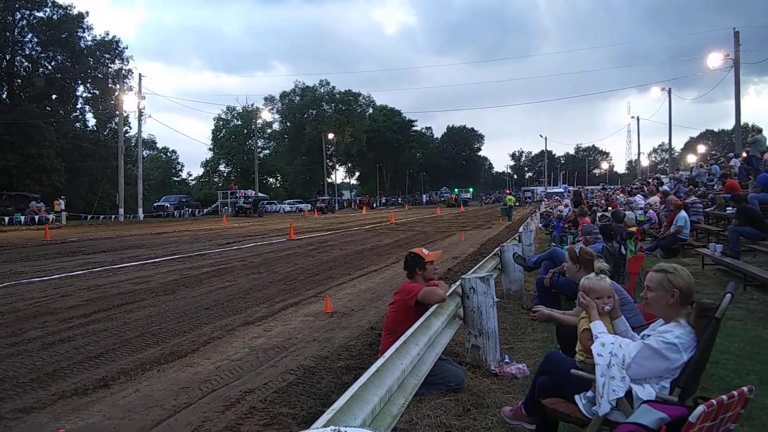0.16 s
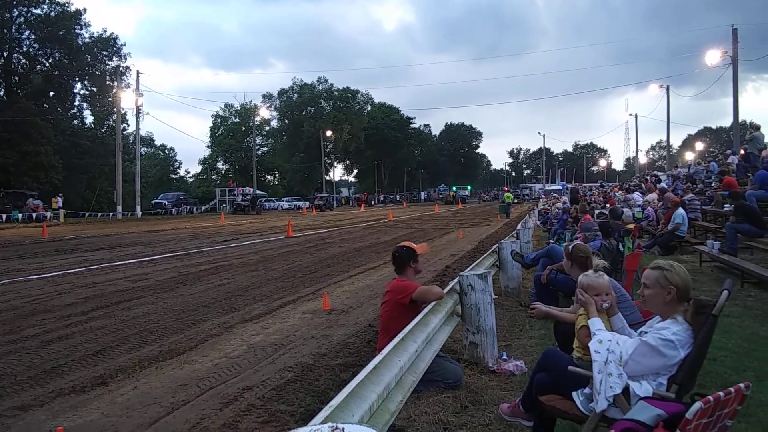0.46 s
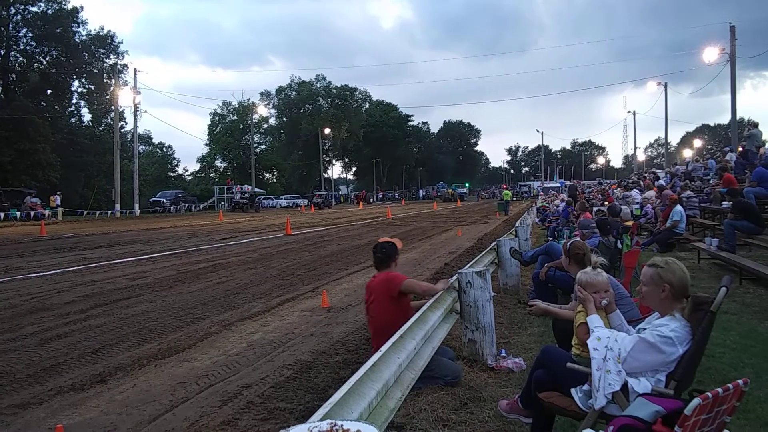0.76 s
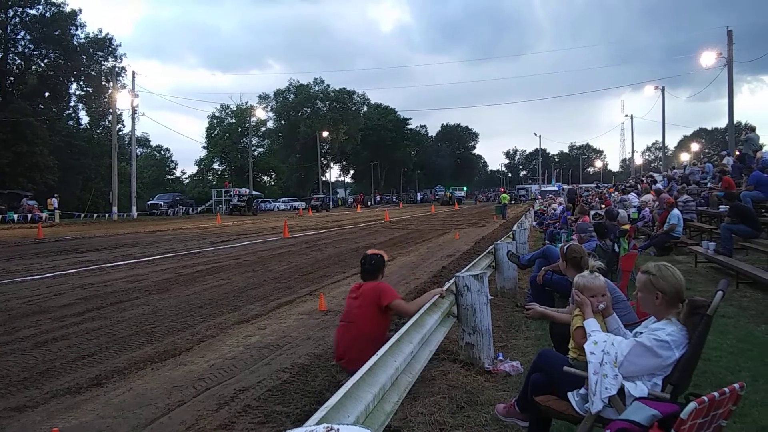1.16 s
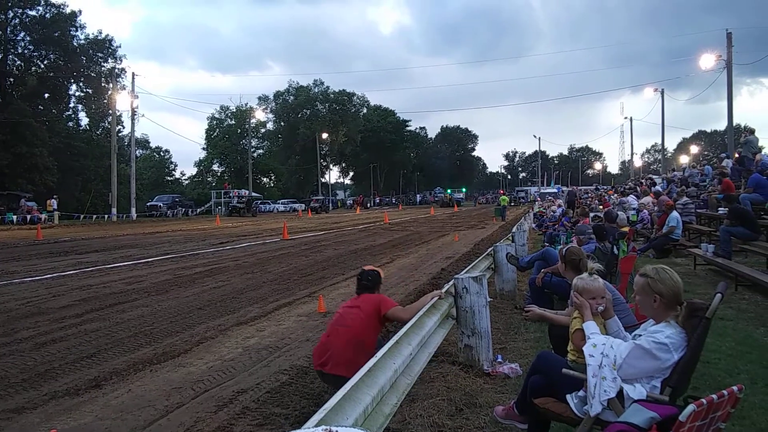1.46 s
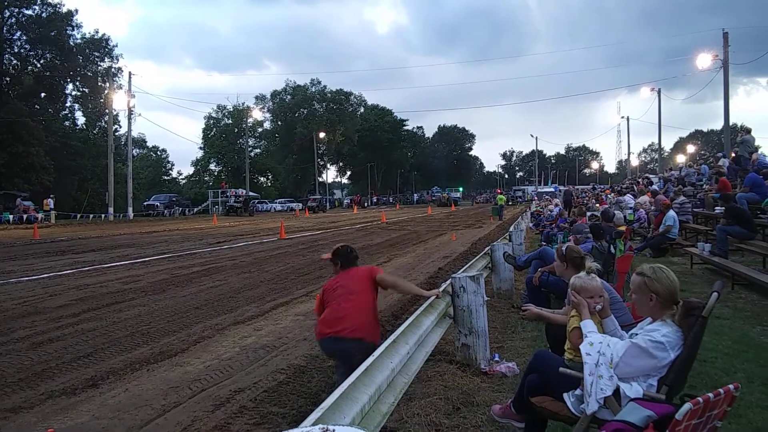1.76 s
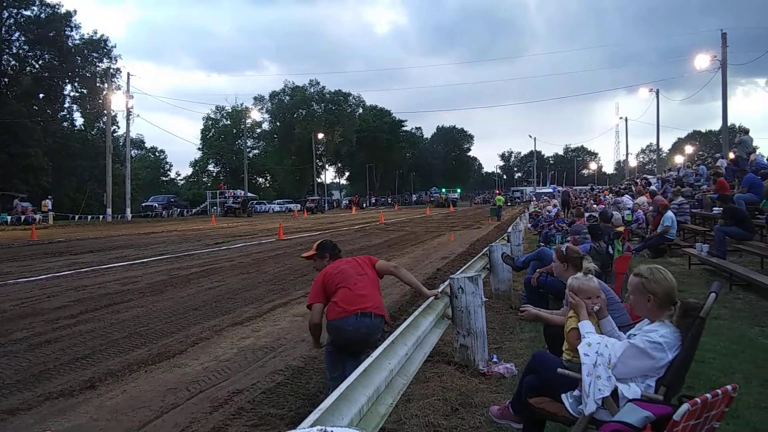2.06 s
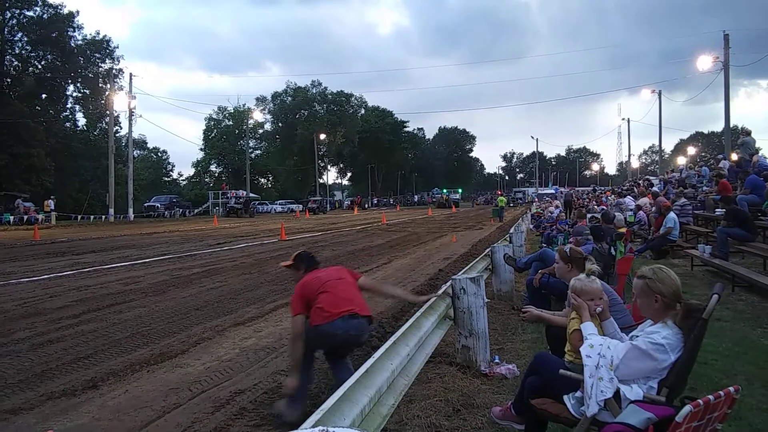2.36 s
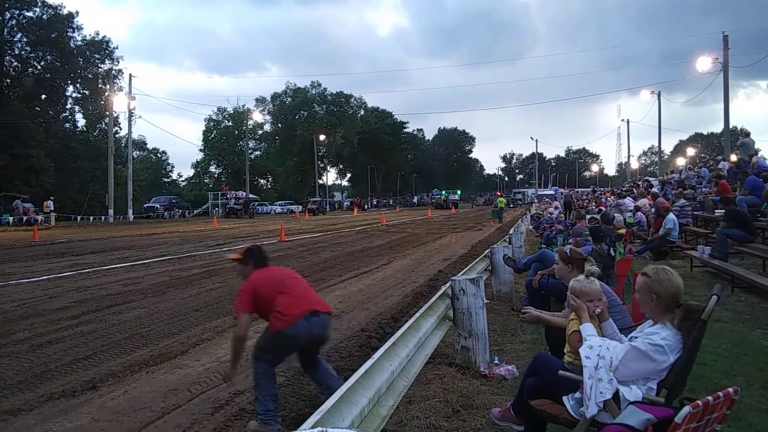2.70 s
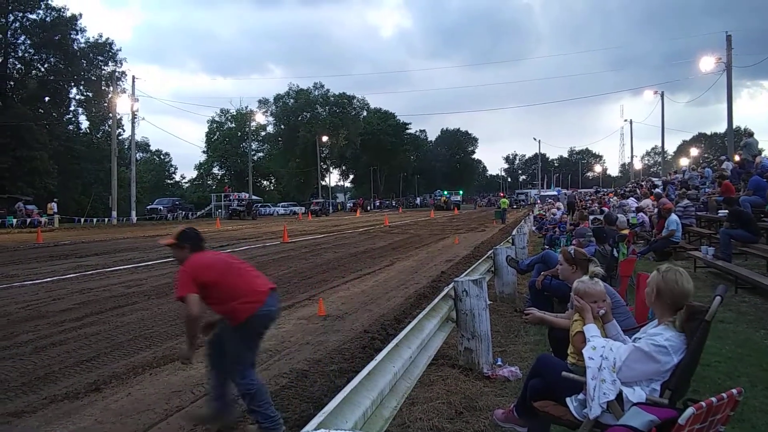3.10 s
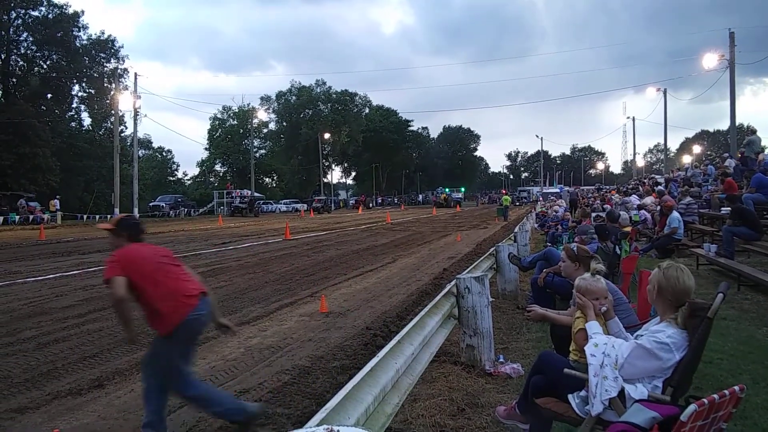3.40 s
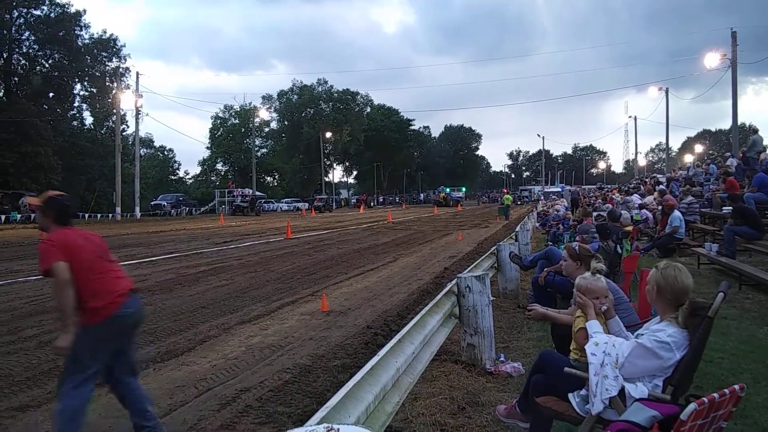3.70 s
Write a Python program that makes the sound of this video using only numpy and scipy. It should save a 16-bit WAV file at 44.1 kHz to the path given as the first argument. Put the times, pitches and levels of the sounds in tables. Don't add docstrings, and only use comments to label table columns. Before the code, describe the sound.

A pulling truck's V8 with open exhaust roars throughout, slightly muted for the first 0.25 s, then at full, nearly constant loudness. Rapid uneven cracks fuse into a raspy buzz with steady low tones and broadband hiss. Pitch sags until about 1.5 s, climbs by 2.7 s, then drops again from about 3.2 s to the end. Outdoor ground reflections shift its colour; faint wind puffs at 3.1 s. The small microphone is overloaded and compressed.

```python
import sys
import numpy as np
from scipy import signal
from scipy.fft import rfft, irfft
from scipy.io import wavfile
from scipy.ndimage import uniform_filter1d, minimum_filter1d

SR = 44100
rng = np.random.default_rng(int(sys.argv[2]) if len(sys.argv) > 2 else 0)


def magnitude_from_level(level_db):
    exponent = np.asarray(level_db, float) / 20
    return 10 ** exponent


def output_pcm(signal):
    pcm = np.clip(np.atleast_2d(signal).T, -1, 1) * 32767
    wavfile.write(sys.argv[1], SR, np.round(pcm).astype(np.int16))


N = 169785
TIME_S = np.arange(N) / SR

# t/s, cycle rate f/Hz, firing tone level/dB, its octave level/dB, bank-beat tone level/dB
ENGINE = [(0.0, 54.26, -14, -25.5, -31.5), (0.59, 52.98, -21, -21, -26.5),
          (0.79, 52.05, -26.5, -20.5, -21.5), (0.87, 52.2, -23.5, -32, -22), (1.01, 50.5, -24, -20.5, -22),
          (1.49, 48.2, -22, -23.5, -33), (1.6, 48.92, -23.5, -21, -31), (1.81, 53.84, -23, -22, -36),
          (2.0, 54.8, -15.5, -18, -34), (2.08, 55.07, -20.5, -23, -25), (2.24, 57.63, -22.5, -29, -24.5),
          (2.54, 55.75, -19.5, -32, -21.5), (2.74, 58.23, -18, -28, -29), (3.03, 56.43, -22, -55, -17),
          (3.13, 57.57, -28, -30, -21.5), (3.23, 57.25, -21.5, -22, -21), (3.46, 54.13, -25, -45, -27),
          (3.85, 51.64, -22, -27, -17.5)]


def evened(x):
    return x / np.sqrt(np.mean(x ** 2) + 1e-20)


def read(points, hz):
    f, db = np.transpose(points)
    return np.interp(np.log(hz + 1), np.log(f + 1), db, left=-90, right=-90)


def slow(top_hz, count):
    t = np.arange(0, N + 256, 256) / SR
    hz = top_hz * np.geomspace(.15, 1, num=16)[:, None]
    sines = np.sin(2 * np.pi * (hz * t + rng.random((count, 16, 1))))
    sums = (sines / np.sqrt(hz)).sum(1)
    return np.array([np.interp(TIME_S, t, evened(s)) for s in sums])


def control(column):
    points = np.transpose(ENGINE)
    return np.interp(TIME_S, points[0], points[column])


def cycles():
    hz = control(column=1)
    return hz, np.cumsum(hz) / SR


def orders(multiples, levels_db, wobble_db, wobble_hz):
    wander_s, wander_hz = 3e-5, 24.71
    hz, turn = cycles()
    sways = slow(wobble_hz, count=len(multiples))
    wanders = slow(wander_hz, count=len(multiples))
    total = np.zeros(N)
    for k, db, sway, wander in zip(multiples, levels_db, sways, wanders):
        phase = round(k) * (turn + wander_s * hz * wander) + rng.random()
        total += magnitude_from_level(db + wobble_db * sway) * np.sin(2 * np.pi * phase)
    return total


def cracks():
    # place in cycle/1, crack level/dB
    cylinders = [
        (.08, 2.5),
        (.15, -3),
        (.27, -2.7),
        (.41, -1.2),
        (.59, 1.5),
        (.73, 3),
        (0.809, -3),
        (.91, -5.3),
    ]
    crack_t60_s, puff_t60_s, jitter_s = 0.015, 0.018, 3.2e-5
    drift_db, drift_hz, spread_db = 1.6, 2.075, 1.5
    firings = 300
    turn, t = cycles()[1], np.arange(1024) / SR
    crack, gate = np.zeros(N), np.zeros(N)
    for (place, db), drift in zip(cylinders, slow(drift_hz, count=len(cylinders))):
        luck = rng.standard_normal((firings, 2))
        at = np.interp(np.arange(firings) + place, turn, np.arange(N), right=N)
        at = at + jitter_s * SR * luck[:, 0]
        keep = at < N - 2
        i, part = at[keep].astype(int), at[keep] % 1
        size = magnitude_from_level(db + drift_db * drift[i] + spread_db * luck[keep, 1])
        train = np.zeros(N)
        train[i], train[i + 1] = size * (1 - part), size * part
        burst = evened(rng.standard_normal(1024) * magnitude_from_level(-60 * t / crack_t60_s))
        crack += signal.oaconvolve(train, burst)[:N]
        gate += signal.oaconvolve(train, magnitude_from_level(-60 * t / puff_t60_s))[:N]
    hiss = signal.lfilter([1, -.55], [1], rng.standard_normal((2, N)))
    crack = signal.lfilter([1], [1, -.25], crack)
    gust = magnitude_from_level(.7 * slow(20, count=1)[0])
    crack_db, puff_db, steady_db = -17.5, -18.5, -19
    return [(crack_db, gust * crack), (puff_db, gust * gate * hiss[0]), (steady_db, gust * hiss[1])]


def overtones():
    # multiple of cycle/1, level/dB
    rings = [(28, -3), (31, -1), (32, -1), (35, 0), (36, 1), (39, 0), (42, -3), (43, -1), (44, 0), (47, 0),
             (48, -2), (51, -2), (52, -1), (55, 0), (59, -3), (63, -1)]
    multiples, levels_db = np.transpose(rings)
    return [(-23, orders(multiples, levels_db, wobble_db=2.5, wobble_hz=12))]


def over_ground(layers):
    # f/Hz, level/dB
    near_colour = [(900, -23), (1500, -10.5), (2500, -2.5), (3700, -10), (6900, -2.5), (8600, -25),
                   (11700, -28), (15800, -53)]
    # f/Hz, level/dB
    halfway_colour = [(900, -40), (1500, -8), (2450, -0.5), (3900, -11.5), (6400, 1.5), (8700, -26.5),
                      (10900, -22), (15800, -49.5)]
    # f/Hz, level/dB
    far_colour = [(900, -53), (1500, -8.5), (2600, -3.5), (4000, -16), (5900, 0.5), (8000, -22),
                  (11800, -31), (15800, -48)]
    halfway_s, opening_s, opening_db, patch_db = 2.2, .25, -5, 1.5
    hz, t, z = signal.stft(np.array([x for _, x in layers]), SR, nperseg=512)
    half = np.interp(t, [0, halfway_s, N / SR], [0, 1, 0])
    near = (1 - half) * (t < halfway_s)
    far = (1 - half) * (t >= halfway_s)
    db = np.outer(read(near_colour, hz), near)
    db += np.outer(read(halfway_colour, hz), half)
    db += np.outer(read(far_colour, hz), far)
    db += opening_db * np.maximum(1 - t / opening_s, 0)
    luck = rng.standard_normal((len(t), len(hz)))
    patches = uniform_filter1d(uniform_filter1d(luck, size=40, axis=0), size=3, axis=1)
    db += patch_db * evened(patches).T
    coloured = signal.istft(z * magnitude_from_level(db), SR, nperseg=512)[1][:, :N]
    return sum(magnitude_from_level(level_db) * evened(x) for (level_db, _), x in zip(layers, coloured))


def tones():
    # multiple of cycle/1, rms level/dB, drift with distance/(dB/s), bend/(dB/s2),
    # rise with speed/(dB/Hz)
    exhaust = [(3.0, -48.5, 0, 1.5, 0.7), (5.0, -41, -0.7, 0.5, 1.35), (6.0, -48.5, 0.0, 0.5, 0.5),
               (7.0, -44.5, -2.5, 1.8, 1.9), (9.0, -37.5, -1.2, 2.3, 1.24), (10.0, -38, -0.5, -0.5, 1.5),
               (11.0, -27.5, 2, 1.2, 1.24), (12.0, -29, -0.6, 1.2, 0.1), (13.0, -26.5, 0.14, 2.0, 0.4),
               (14.0, -32.5, 6, -5, -1), (15.0, -32.5, 0.5, 0.7, -0.3), (17.0, -35.5, 4, 0.9, 2),
               (18.0, -33, 1.8, -4, 1.2), (20.0, -34, -0.9, 2.1, -1.2), (21.0, -38, -1.5, 1, 0.9),
               (22.0, -46, 2.5, 2, -0.5), (23.0, -45, -2, 0.6, 1.5), (24.0, -42, 0.5, 2.9, -0.9)]
    leading = [8, 16, 19]
    mid_s, mid_hz = 1.9, 54
    hz, t = cycles()[0] - mid_hz, TIME_S - mid_s
    levels_db = [db + drift * t + bend * t ** 2 + rise * hz for _, db, drift, bend, rise in exhaust]
    levels_db += [control(column=c) for c in range(2, len(ENGINE[0]))]
    multiples = [row[0] for row in exhaust] + list(leading)
    return np.sqrt(2) * orders(multiples, levels_db, wobble_db=2, wobble_hz=14)


def roar():
    # f/Hz, level/dB
    turbulence = [(15, -54), (25, -24), (332, -16.5), (415, -9), (519, -11.5), (626, -4.5), (756, -8),
                  (1030, -5.5), (1500, -14), (1950, -61), (3300, -120)]
    hz = np.fft.rfftfreq(N, 1 / SR)
    noise = rfft(rng.standard_normal(N))
    return magnitude_from_level(-25.5) * evened(irfft(noise * magnitude_from_level(read(turbulence, hz)), N))


def buffet():
    centre_s, length_s, level_db, top_hz = 3.1, .12, -34, 110
    lowpass = signal.butter(2, top_hz, fs=SR, output="sos")
    low = signal.sosfilt(lowpass, rng.standard_normal(N))
    return magnitude_from_level(level_db) * evened(low) * np.exp(-((TIME_S - centre_s) / length_s) ** 2)


def scene():
    return (over_ground(cracks() + overtones()) + tones() + roar() + buffet())[None]


def roll_off(x):
    return signal.sosfilt(signal.butter(12, 15910, fs=SR, output="sos"), x)


def record(dry):
    # f/Hz, level/dB
    housing = [(20, -6), (3210, 2.5), (3480, -7.5), (4000, -3.5), (4250, -1), (12800, -0.5), (14400, -3),
               (22100, 14)]
    squeeze, clip_level, edge_hz = .45, 0.71, 15720
    hz = np.fft.rfftfreq(N, 1 / SR) + 20
    x = irfft(rfft(dry) * magnitude_from_level(read(housing, hz)), N)
    power = uniform_filter1d(uniform_filter1d(x ** 2, size=500), size=500)
    x = x * (np.mean(power) / power) ** (squeeze / 2)
    gain = minimum_filter1d(np.minimum(clip_level / (abs(x) + 1e-9), 1), size=9)
    x = x * uniform_filter1d(uniform_filter1d(gain, size=5), size=5)
    lowpass = signal.firwin(511, edge_hz, window=("kaiser", 9), fs=SR)
    return roll_off(signal.oaconvolve(x, lowpass[None], "same"))


dry = scene()
out = record(dry)
output_pcm(out)
```